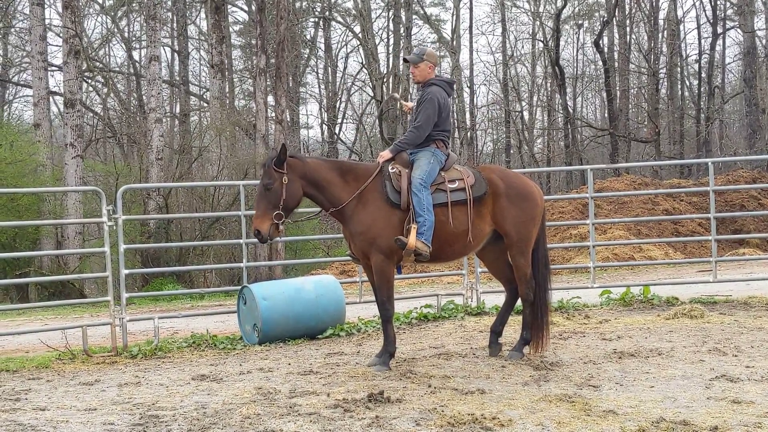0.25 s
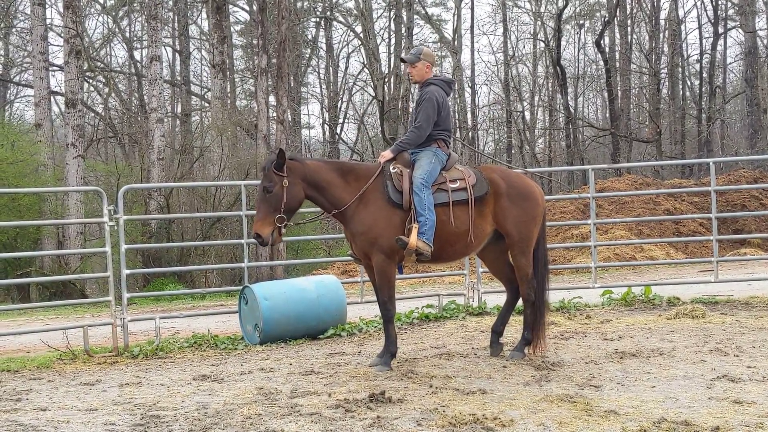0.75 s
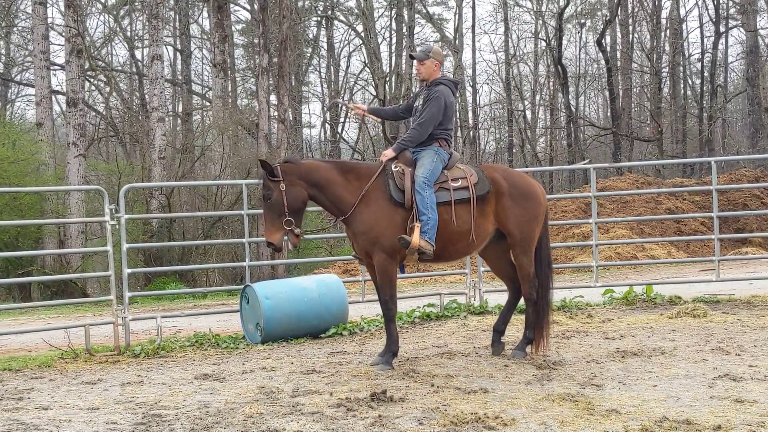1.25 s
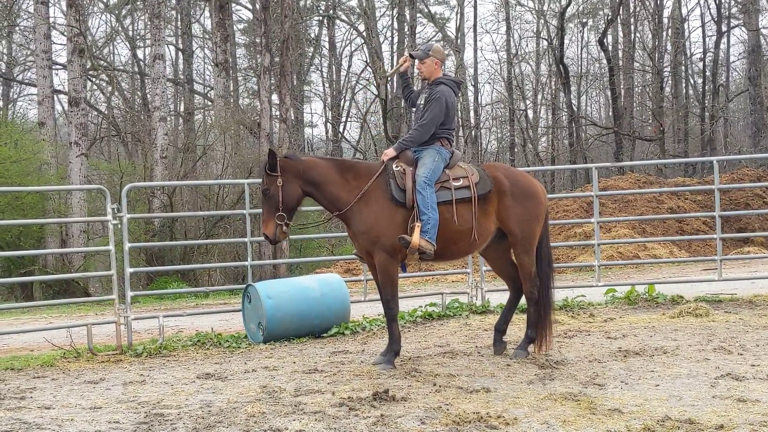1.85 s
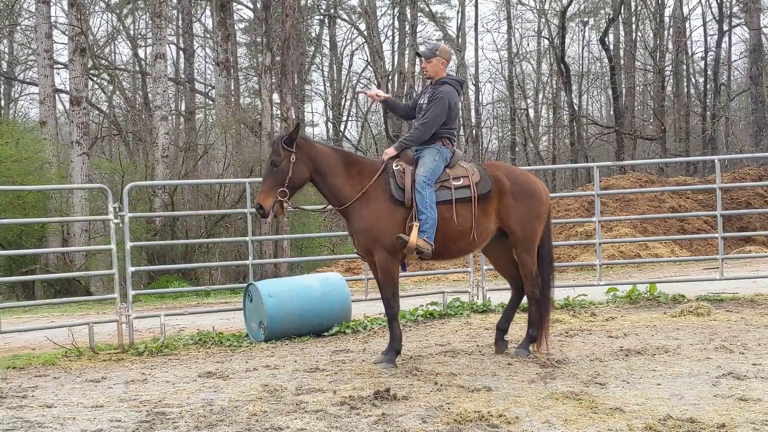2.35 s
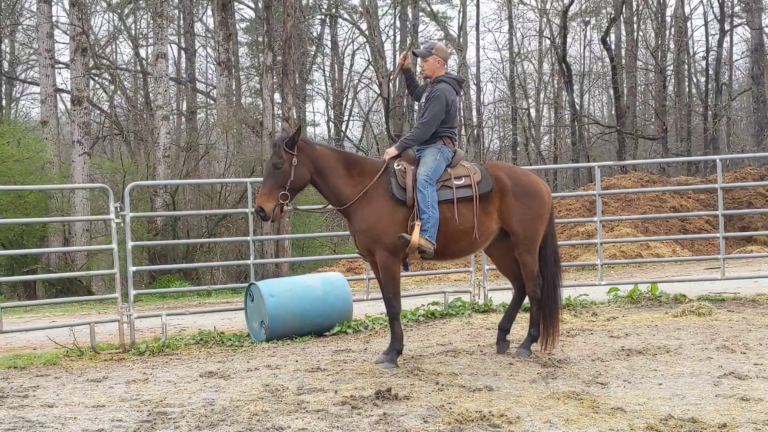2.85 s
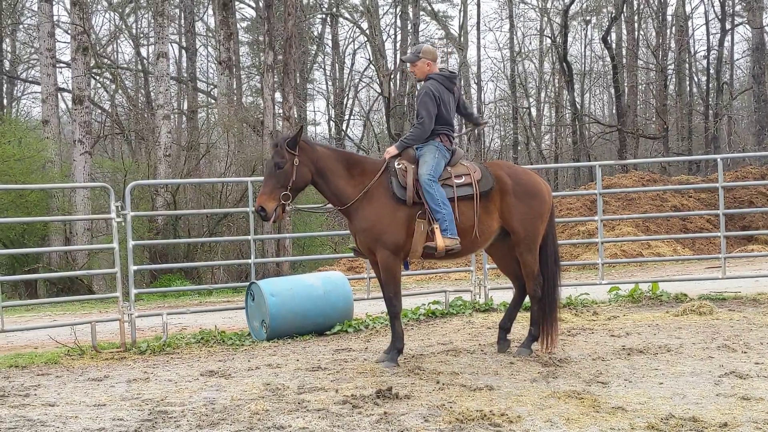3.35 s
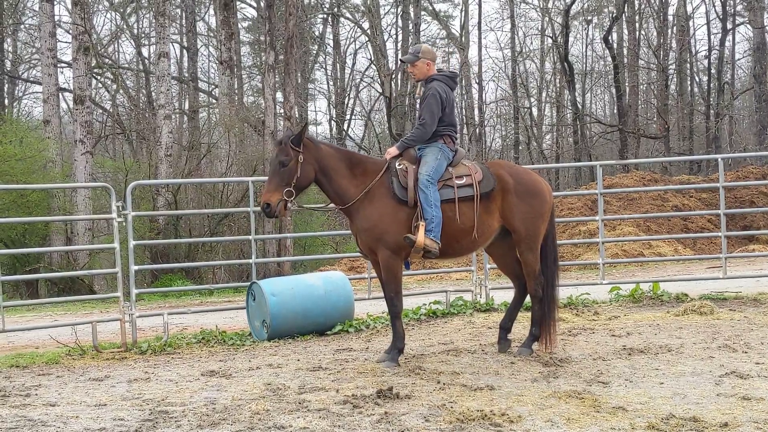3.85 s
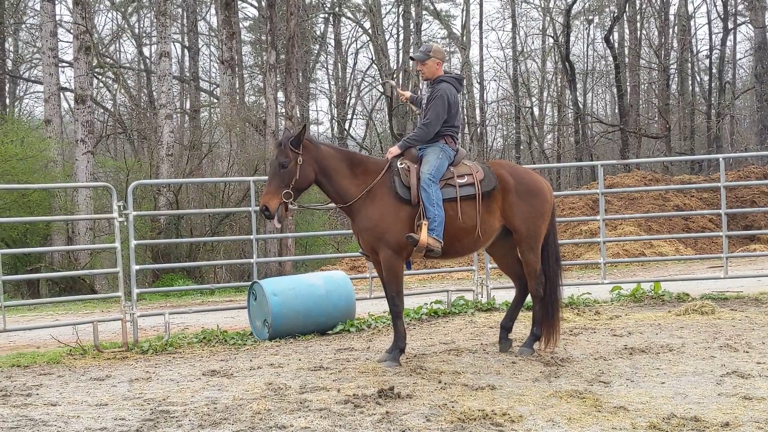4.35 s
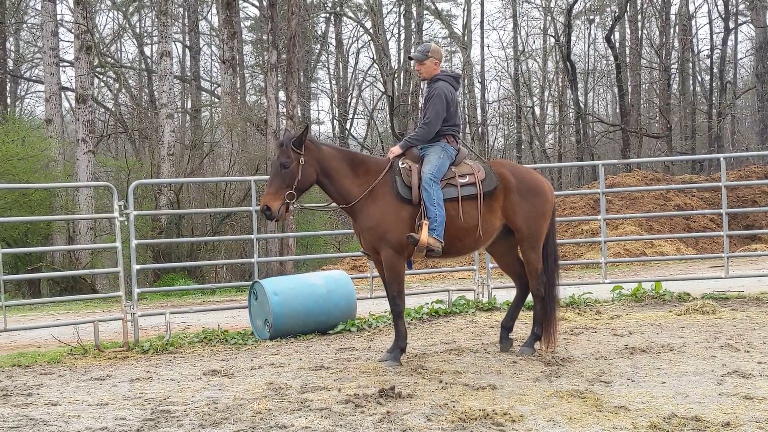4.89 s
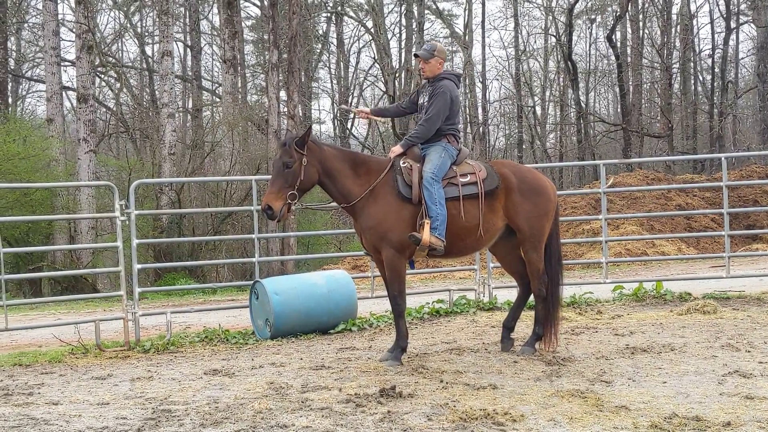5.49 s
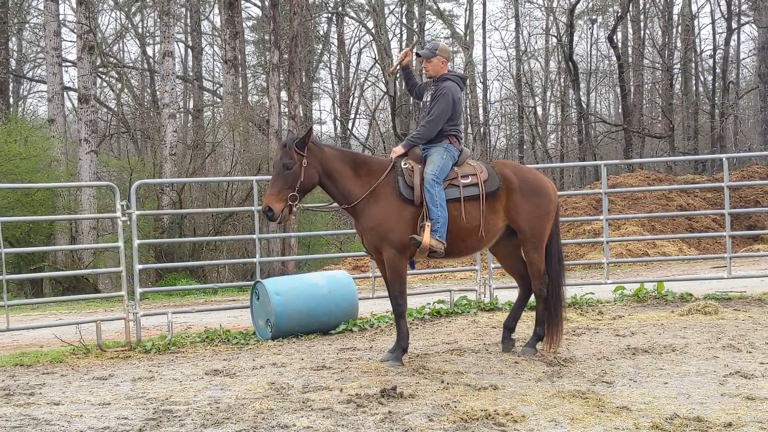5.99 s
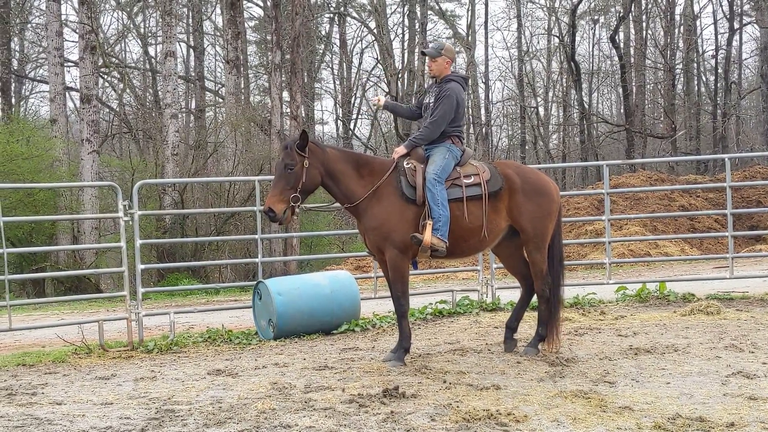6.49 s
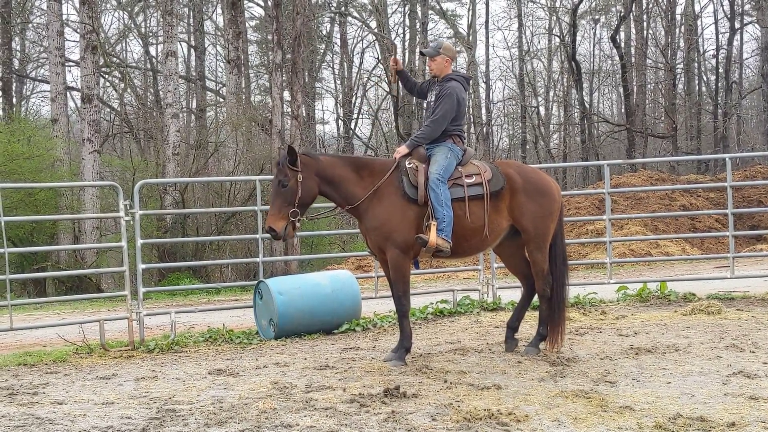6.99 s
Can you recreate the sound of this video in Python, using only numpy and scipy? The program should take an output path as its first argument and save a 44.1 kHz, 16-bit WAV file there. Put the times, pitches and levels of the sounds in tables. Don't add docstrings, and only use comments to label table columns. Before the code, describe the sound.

Quiet open paddock with distant birdsong and low rumble; a rope whooshes, then one violent sharp crack echoes off rails and woods, fading to birds.

```python
import sys
import numpy as np
from scipy import signal
from scipy.fft import rfft, irfft
from scipy.io import wavfile
from scipy.ndimage import uniform_filter1d

SR = 44100
rng = np.random.default_rng(int(sys.argv[2]) if len(sys.argv) > 2 else 0)


def ratio(d):
    e = np.asarray(d, float) / 20
    return 10 ** e


def dump(signal):
    limited = np.clip(np.atleast_2d(signal).T, -1, 1)
    pcm = np.round(limited * 32767).astype(np.int16)
    wavfile.write(sys.argv[1], SR, pcm)


N = 318843

# frequency in Hz, level in dB per Hz.
RUMBLE_SPECTRUM = [(12, -30), (20, 1), (41, 0), (65, -9), (216, -11.5), (446, -28), (800, -29.5),
                   (1300, -34), (2000, -35), (2820, -32), (3740, -36), (5380, -35), (16000, -45)]
RUMBLE_DB = -57
# frequency in Hz, likeness from -1 to 1.
RUMBLE_LIKENESS = [(60, 1), (150, 0.79), (380, 0.78), (950, 0.2), (2380, 0.12), (5980, -0.04),
                   (15000, -0.037)]
# frequency in Hz, left over right in dB.
RUMBLE_LEAN = [(60, 0.5), (240, 0.5), (950, -3.5), (3770, -1.5), (15000, -3)]

# time in seconds, level in dB.
ANSWERED_CRACKS = [
    (-.52, -3),
    (3.5578, 0),
]
# arrival after the crack in seconds, peak in dB, left over right in dB, depth in seconds.
TREE_STANDS = [
    (.012, -28, -6, .045),
    (.155, -36.5, -3.5, .035),
    (.225, -34, -5, .045),
    (.39, -42.5, -4.5, .02),
]
WOODS_DB, WOODS_DB_PER_S, WOODS_PAN_DB, WOODS_END_S = -42.5, 21, -4.5, 1.45

# start in the phrase in seconds, length in seconds, first pitch in Hz, last pitch in Hz, level in dB.
TRILL_NOTES = [
    (0, 0.012, 6600, 8400, -63),
    (.014, .02, 8300, 7400, -69),
    (.052, 0.0143, 4700, 5940, -63.5),
    (.066, 0.02, 5900, 4250, -68.5),
]
FALL_NOTES = [
    (0, 0.037, 5050, 3300, -64.5),
]
WARBLE_NOTES = [
    (0, 0.03, 2230, 2220, -69),
    (.062, .05, 2400, 2980, -63),
    (.105, .075, 2928, 2900, -71),
    (.16, 0.007, 4344, 4280, -66),
    (.168, .012, 4100, 3100, -72),
    (.195, 0.022, 2850, 3480, -64),
    (.245, .055, 2400, 1800, -72),
]
LOW_LILT_NOTES = [
    (0, 0.034, 2160, 2340, -63),
    (.032, .035, 2721, 2578, -64.5),
    (.045, .03, 2600, 2287, -66),
    (.055, .022, 2304, 1900, -69.5),
]
HIGH_LILT_NOTES = [
    (0, .022, 2192, 2260, -73.5),
    (.032, 0.051, 3005, 3133, -69.5),
    (.05, .03, 3100, 2750, -71),
    (.066, 0.028, 2853, 2478, -69),
]
# start in seconds, level in dB.
TRILL_TIMES = [(.06 + .0945 * k, -.07 * k ** 2) for k in range(-1, 11)]
FALL_TIMES = [(4.514 + .1376 * k, -3 - .2 * (k - 4) ** 2) for k in range(10)]
WARBLE_TIMES = [
    (4.035, 5),
    (4.448, 4),
    (4.858, 4),
]
LOW_LILT_TIMES = [(s + .4027 * k, -12 + 2.2 * k) for s, count in ((1.797, 4),
                  (6.615, 2)) for k in range(count)]
HIGH_LILT_TIMES = [(s + .4027 * k, -2.6 + 1.3 * k) for s, count in ((1.957, 4),
                   (6.375, 3)) for k in range(count)]

# time in seconds, peak in dB, pitch in Hz, cycles of ringing, grit in dB.
TICKS = [(0.127, -42, 900, 1.7, -29), (0.2823, -44.5, 600, 0.63, -25), (.394, -47, 746, 2.6, -9),
         (.409, -47.5, 800, 1.3, -9), (1.296, -47, 9350, 3.3, -10.5), (1.62, -51.5, 1200, 2.5, -12.5),
         (1.639, -60, 3900, 2.5, -5), (1.899, -58.5, 900, 2.1, -25), (1.989, -59, 930, 2.1, -25),
         (2.166, -63, 1100, 2.1, -25), (2.219, -57, 895, 2.8, -25), (4.572, -47, 550, 0.76, -29),
         (4.64, -40, 930, 1.47, -18), (4.648, -50, 1500, 2.5, -6), (4.659, -48.5, 860, 2.1, -13),
         (4.686, -51.5, 1000, 1.5, -15)]
# time of top speed in seconds, level in dB, eddy pitch there in Hz,
# speeding up in seconds, slowing down in seconds.
ROPE_PASSES = [(.362, -60.5, 638, 0.039, 0.044), (.4, -65, 690, .02, 0.027),
               (1.655, -55, 870, 0.051, 0.091), (2.585, -68.5, 695, .1, .05),
               (2.65, -68.5, 630, 0.031, 0.053), (2.795, -61.5, 684, .06, .15), (3.44, -59, 750, .09, .04),
               (3.548, -52, 990, .11, 0.0073), (4.635, -64, 600, .05, .006), (5.905, -52, 1002, 0.03, .11),
               (6.6, -69.5, 481.3, .04, .04), (6.67, -67, 539, .05, .07), (6.8, -61.5, 711, 0.065, 0.052),
               (6.855, -64, 741, .03, 0.081), (7.016, -62, 632, 0.073, 0.11), (7.16, -72, 470, 0.031, .05)]
# time of top speed in seconds, level in dB, eddy pitch there in Hz,
# speeding up in seconds, slowing down in seconds.
TIP_PASSES = [
    (1.627, -59, 1240, .022, 0.053),
    (3.548, -53.5, 1060, .05, 0.0037),
    (6.66, -71, 780, .05, 0.063),
    (6.84, -68, 820, .08, .06),
    (7.015, -66, 820, .05, .05),
]
ROPE_SPREAD, TIP_SPREAD = 0.11, 0.27
SLOW_IN, SLOW_OUT, IN_DB, OUT_DB = .85, .68, -22, -19.5

CRACK_S, CRACK_DB = 3.5578, -6
# frequency in Hz, level in dB per Hz.
CRACK_SPECTRUM = [(40, -13.5), (150, -8.5), (270, -9), (560, -15), (780, 5), (1000, -9), (1500, -5),
                  (2900, -2.5), (4000, -13), (8000, -17), (13000, -13.5), (16000, -22.5), (17500, -44)]
# time in seconds, peak in dB, left over right in dB, length in seconds.
SHOCKS = [
    (3.5582, -4, 2, .00022),
    (3.5599, -5.5, -1, .0002),
    (3.5611, -4, 1, .00015),
    (3.5617, -5, -1, .00012),
    (3.5637, -7, -2.5, .00015),
    (3.7771, -22, -5, .00006),
]

# time in seconds, peak in dB, left over right in dB, brightness in dB per octave.
HARD_ECHOES = [(3.5728, -12.5, -4, 7), (3.6125, -14, -2, 3.5), (3.6244, -15, -2, 1.5), (3.636, -19, -5, -1),
               (3.7295, -19, 6.5, -1.5), (3.747, -23.5, -18, 1), (3.77, -23, -1.1, 5),
               (3.7755, -20.5, -10, -0.5), (3.806, -22, -4, 0), (3.8185, -19, -8, -0.4),
               (3.852, -27.5, -4, -4.5), (3.8708, -26.5, -9, 1.5), (3.9576, -29, -13, 1),
               (3.9644, -34, 1.1, .6), (4.053, -35.5, 1, 1.1), (4.1899, -44, 2.1, 2.5),
               (4.2392, -39, 8, .6), (4.2832, -41, 1.1, -2.5)]
# frequency in Hz, level in dB per Hz.
RETURN_SPECTRUM = [(80, -26), (200, -9.5), (320, -9), (550, -10.5), (900, -0.5), (1500, -0.5), (2650, 0.5),
                   (4950, -3), (7000, -6.5), (12000, -11.5), (16000, -21.5)]
# frequency in Hz, loss in dB per second of path.
PATH_LOSS = [(150, 11.5), (400, -20), (800, -7), (2000, -8.5), (5000, -1), (9000, 21.5), (16000, 49)]

# frequency in Hz, side signal in dB, left over right in dB.
PORT_DIFFERENCE = [(60, -5.5, 4.5), (300, -5.5, 0), (600, -8, 0), (1200, -0.5, .5), (4000, 3, -2),
                   (12000, 3.5, -4.5)]
# centre in Hz, width in Hz, gain in dB.
MICROPHONE_PEAKS = [(2670, 660, 2.5), (4320, 660, 2), (5795, 1200, 3.5), (6450, 470, -4), (7690, 700, 3),
                    (9580, 770, 5.5), (11712, 340, 6.5)]
# time in seconds, jump of the offset, rise in seconds.
GAIN_STEPS = [
    (.28, 0.028, 0.01),
    (3.556, -0.6, 0.0084),
    (4.569, 0.035, 0.0081),
]


def amp_of(points, hz):
    f, value = np.transpose(points)
    return np.interp(np.log(hz + 1), np.log(f + 1), value)


def evened(x):
    return x / np.sqrt(np.mean(x ** 2) + 1e-20)


def panned(pan_db):
    return ratio(pan_db * np.array([[.5], [-.5]]))


def add(mix, s, sound, pan_db=0):
    part = mix[:, round(s * SR):][:, :np.shape(sound)[-1]]
    part += panned(pan_db) * sound[..., :part.shape[1]]


def coloured(x, db_of, size=4096):
    hz = abs(np.fft.fftfreq(size, 1 / SR))
    gain = np.log(ratio(np.maximum(db_of(hz), -100)))
    phase = -signal.hilbert(gain).imag
    taps = np.fft.ifft(np.exp(gain + 1j * phase)).real[:size // 2]
    return signal.oaconvolve(x, taps[None], axes=1)[:, :x.shape[1]]


def resonate(x, hz, width):
    turn = np.exp(2j * np.pi * np.cumsum(hz) / SR)
    r = np.exp(-np.pi * width / SR)
    return 2 * (turn * signal.lfilter([1 - r], [1, -r], x / turn)).real


def scatter(count, spread_db, same):
    a, b, size = rng.standard_normal((count, 3)).T
    right = same * a + np.sqrt(1 - same ** 2) * b
    return evened(np.array([a, right]) * ratio(spread_db * size))


def countryside():
    frames, hz = N // 256 + 5, np.fft.rfftfreq(1024, 1 / SR)
    a, b, c, d, patches = rng.standard_normal((frames, 513, 5)).T
    patches = evened(uniform_filter1d(uniform_filter1d(patches, 10, 0), 16, 1))
    same = np.clip(amp_of(RUMBLE_LIKENESS, hz), -1, 1)[:, None]
    left = a + 1j * b
    right = same * left + np.sqrt(1 - same ** 2) * (c + 1j * d)
    lean_db = np.multiply.outer([.5, -.5], amp_of(RUMBLE_LEAN, hz))[..., None]
    z = np.array([left, right]) * ratio(amp_of(RUMBLE_SPECTRUM, hz)[:, None] + .8 * patches + lean_db)
    return ratio(RUMBLE_DB) * evened(signal.istft(z, nperseg=1024, noverlap=768)[1][:, :N])


def woods_level(since):
    fade_out = np.clip((WOODS_END_S - since) / 0.28, 0, 1)
    late = ratio(WOODS_DB - WOODS_DB_PER_S * since) * fade_out * (since > .015)
    power = (late * panned(WOODS_PAN_DB)) ** 2
    for s, db, pan_db, depth in TREE_STANDS:
        u = np.maximum(since - s, 0) / depth
        swell = ratio(db) * (u * np.exp(1 - u)) ** 2
        power = power + (swell * panned(pan_db)) ** 2
    return np.sqrt(power)


def woods():
    t = np.arange(N) / SR
    level = sum(ratio(db) * woods_level(t - s) for s, db in ANSWERED_CRACKS)
    return scatter(N, spread_db=3.5, same=0.47) * level


def birds():
    mix, t = np.zeros((2, N)), np.arange(SR // 2) / SR
    # phrase, times, left over right dB, trees dB, trees' decay s
    flock = ((TRILL_NOTES, TRILL_TIMES, -2.5, 3.5, .3), (FALL_NOTES, FALL_TIMES, .1, -2.5, .4),
             (WARBLE_NOTES, WARBLE_TIMES, -4, -1.5, .5),
             (LOW_LILT_NOTES, LOW_LILT_TIMES, -5, 5, .6), (HIGH_LILT_NOTES, HIGH_LILT_TIMES, -5, 5, .6))
    for phrase, starts, pan_db, trees_db, t60 in flock:
        song = np.zeros((2, N))
        for start, loud_db in starts:
            for s, length, from_hz, to_hz, db in phrase:
                hz = np.linspace(from_hz, to_hz, round(length * SR)) * rng.uniform(0.985, 1.012)
                note = np.sin(2 * np.pi * np.cumsum(hz) / SR) * signal.windows.tukey(len(hz), .6)
                if start + s > 0:
                    add(song, start + s, ratio(db + loud_db) * note, pan_db)
        trees = scatter(len(t), spread_db=5.0, same=0.11) * ratio(-60 * t / t60) * (t > .004)
        trees /= np.linalg.norm(trees[0])
        mix += song + ratio(trees_db) * signal.oaconvolve(song, trees, axes=1)[:, :N]
    return mix


def ticks():
    mix, t = np.zeros((2, N)), np.arange(SR // 30) / SR
    for s, db, hz, cycles, grit_db in TICKS:
        ring = np.sin(2 * np.pi * hz * t) * np.exp(-t * hz / cycles)
        grit = scatter(len(t), spread_db=1.5, same=0.5) * ratio(grit_db - 60 * t / 0.056)
        add(mix, s, ratio(db) * (ring + grit), pan_db=-3.5)
    return mix


def whoosh(s, db, top_hz, rise, fall, spread):
    t = np.arange(-rise, fall, 1 / SR)
    slack = np.where(t < 0, -t / rise, t / fall)
    hz = top_hz * (1 - slack * (1 - np.where(t < 0, SLOW_IN, SLOW_OUT)))
    gusts = rng.standard_normal(SR // 2)[:len(t)]
    narrow = resonate(gusts, hz, spread * top_hz)
    whistle = evened(resonate(narrow, hz, 1.8 * spread * top_hz))
    level = ratio(db + np.where(t < 0, IN_DB, OUT_DB) * slack ** 1.62)
    return s - rise, level * whistle * signal.windows.tukey(len(t), .15)


def rope():
    mix = np.zeros((2, N))
    for rows, spread in ((ROPE_PASSES, ROPE_SPREAD), (TIP_PASSES, TIP_SPREAD)):
        for row in rows:
            add(mix, *whoosh(*row, spread), pan_db=-3.3)
    return mix


def crack_tone(x):
    return coloured(x, lambda hz: amp_of(CRACK_SPECTRUM, hz) + 9)


def tip_rush():
    rush_s = .04
    mix, t = np.zeros((2, N)), np.arange(-rush_s, 0, 1 / SR)
    hiss = scatter(SR // 10, spread_db=1.5, same=.6)[:, :len(t)]
    add(mix, CRACK_S - rush_s, hiss * ratio(-33 + 2300 * t))
    return crack_tone(mix)


def crack():
    mix, t = np.zeros((2, N)), np.arange(SR // 5) / SR
    clatter = scatter(len(t), spread_db=3.0, same=.45) * np.minimum(t / .0005, 1)
    decay = ratio(-60 * t / 0.056) + ratio(-11.5 - 60 * t / .15)
    add(mix, CRACK_S, ratio(CRACK_DB) * clatter * decay, pan_db=0.5)
    mix = crack_tone(mix)
    t = np.arange(SR // 200) / SR
    for s, db, pan_db, length in SHOCKS:
        add(mix, s, ratio(db) * (1 - t / length) * np.exp(-t / length), pan_db)
    swell = np.sin(2 * np.pi * 1250 * t) * signal.windows.hann(len(t))
    add(mix, CRACK_S - .0018, ratio(-13.5) * swell)
    return mix


def hard_echoes():
    mix, t = np.zeros((2, N)), np.arange(SR // 8) / SR
    rise_s, t60_s = 0.0016, 0.029
    for s, db, pan_db, bright_db in HARD_ECHOES:
        level = np.minimum(t / rise_s, 1) * ratio(db - 6.5 - 60 * t / t60_s)
        clump = scatter(len(t), spread_db=2.5, same=.3) * level
        clump = coloured(clump, lambda hz: bright_db * np.log2(np.maximum(hz, 200) / 3000), size=512)
        add(mix, s, clump, pan_db)
    return mix


def travelled(mix):
    hz, t, z = signal.stft(mix, SR, nperseg=128)
    last_crack = np.where(t < CRACK_S, ANSWERED_CRACKS[0][0], CRACK_S)
    path_s = np.clip(t - last_crack - .09, 0, 1.2)
    patches = rng.standard_normal((len(t), len(hz))).T
    patches = evened(uniform_filter1d(uniform_filter1d(patches, 5, 0), 12, 1))
    z *= ratio(2.0 * patches - amp_of(PATH_LOSS, hz)[:, None] * path_s)
    back = signal.istft(z, SR, nperseg=128)[1][:, :N]
    return coloured(back, lambda hz: amp_of(RETURN_SPECTRUM, hz) + 3)


def ports(x):
    hz, (f, side_db, lean_db) = np.fft.rfftfreq(N, 1 / SR), np.transpose(PORT_DIFFERENCE)
    left, right = rfft(x)
    side = (left - right) / 2 * ratio(amp_of(np.c_[f, side_db], hz))
    pair = (left + right) / 2 + np.array([side, -side])
    lean = ratio(np.outer([.5, -.5], amp_of(np.c_[f, lean_db], hz)))
    return irfft(pair * lean, N)


def scene():
    returns = travelled(woods() + hard_echoes())
    return countryside() + birds() + ticks() + rope() + ports(tip_rush() + crack() + returns)


def gain_thumps():
    t, offset = np.arange(N) / SR, np.zeros(N)
    for s, jump, rise in GAIN_STEPS:
        u = np.maximum(t - s, 0) / rise
        offset += jump * (1 - (1 + u) * np.exp(-u))
    for hz in (.45, .7, 2.9, 4.4):
        offset = signal.lfilter([1, -1], [1, -np.exp(-2 * np.pi * hz / SR)], offset)
    return offset * ratio([[1.2], [-1.2]])


def microphone_db(hz):
    return sum(db * np.exp(-((hz - f) / width) ** 2 * 2) for f, width, db in MICROPHONE_PEAKS) - 0.25


def roll_off(x):
    return signal.sosfilt(signal.butter(12, 16800, fs=SR, output="sos"), x)


def record(dry):
    x = coloured(dry, microphone_db)
    x = .76 * np.tanh((x + gain_thumps()) / .76)
    edge = signal.firwin(301, 15900, window=("kaiser", 7), fs=SR)
    x = signal.oaconvolve(x, edge[None], "same")
    return roll_off(x)


dry = scene()
out = record(dry)
dump(out)
```